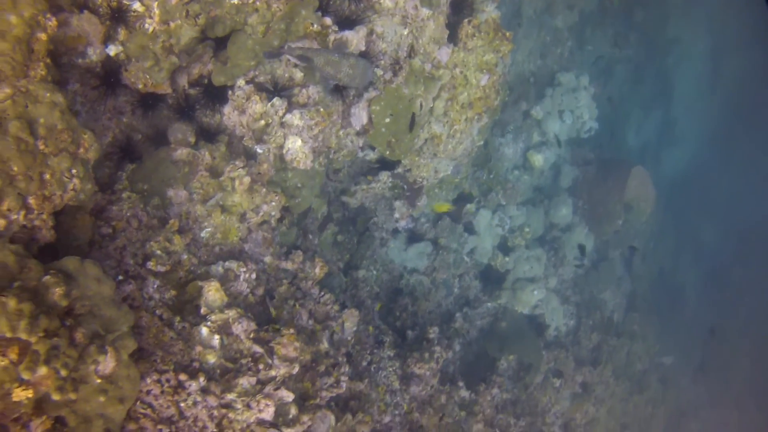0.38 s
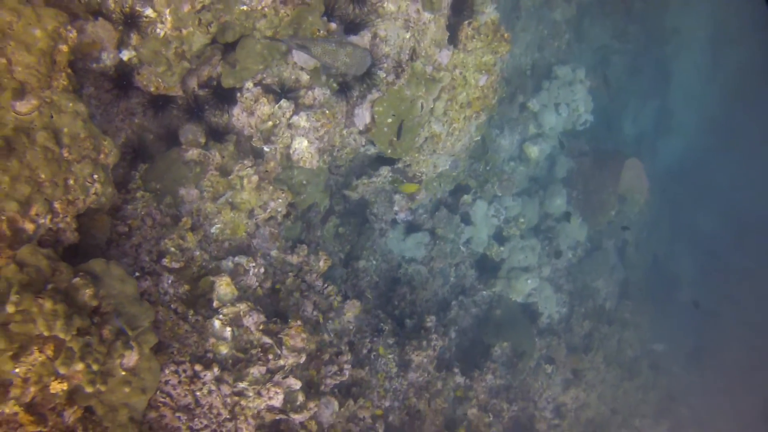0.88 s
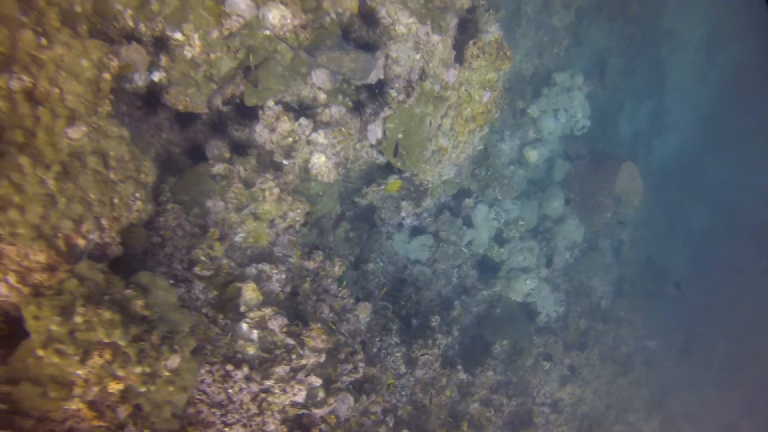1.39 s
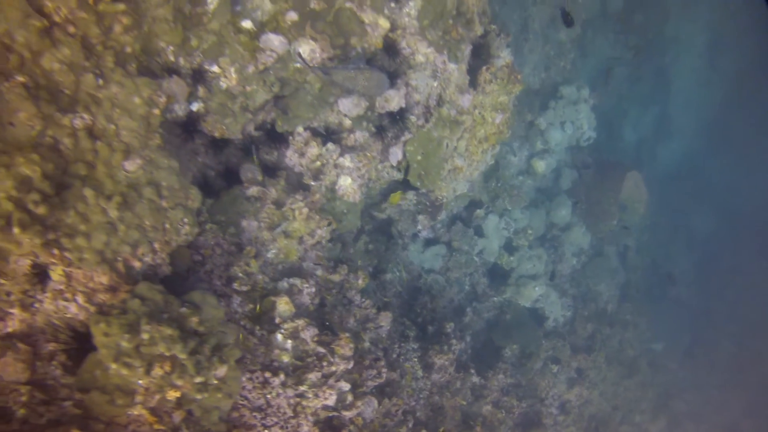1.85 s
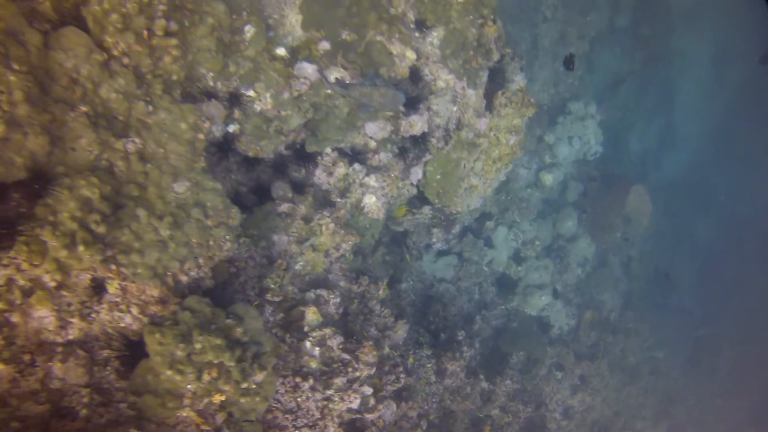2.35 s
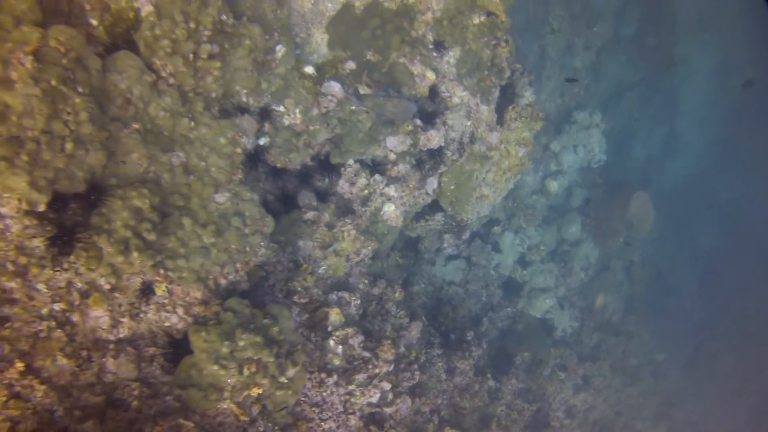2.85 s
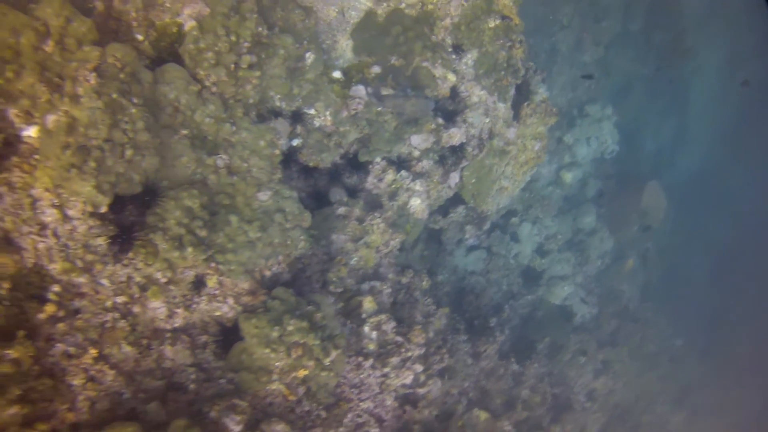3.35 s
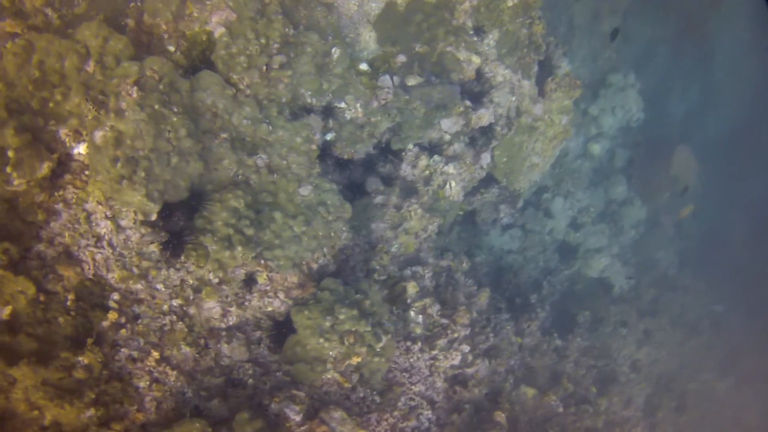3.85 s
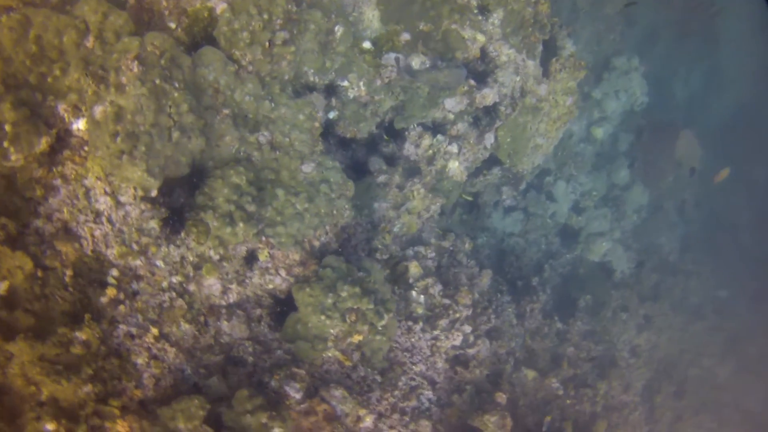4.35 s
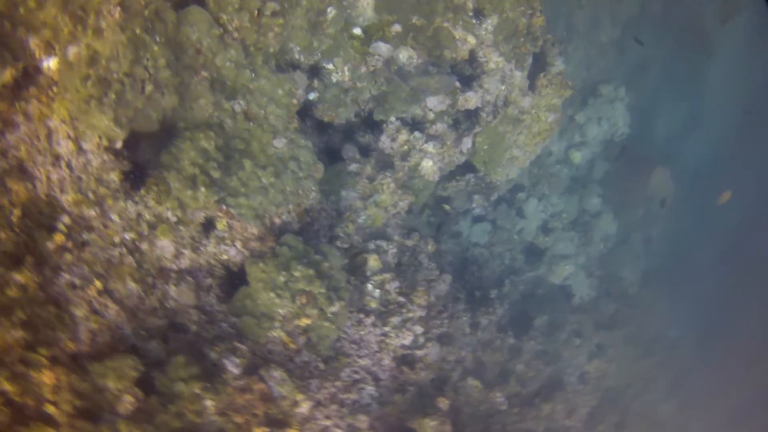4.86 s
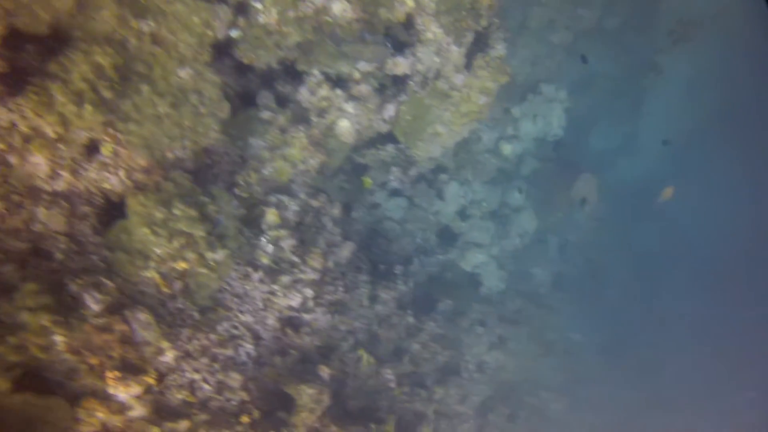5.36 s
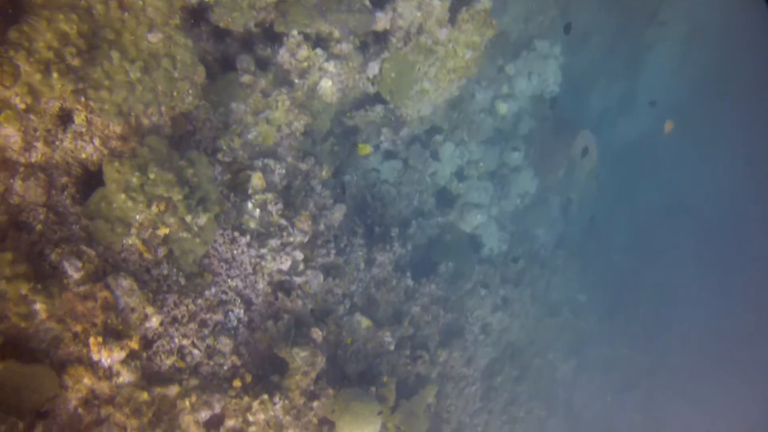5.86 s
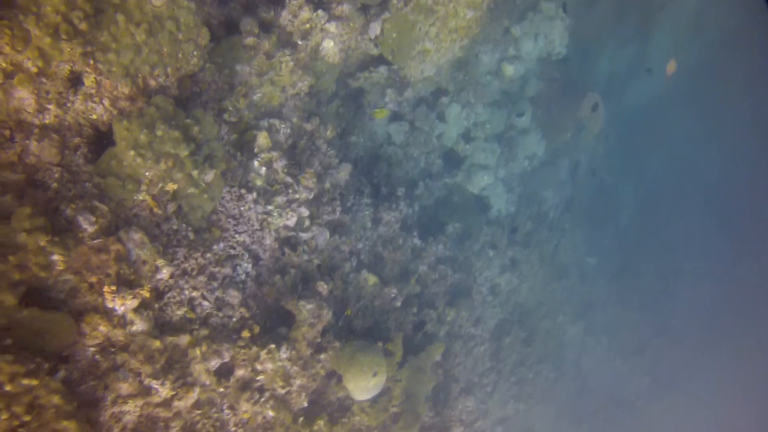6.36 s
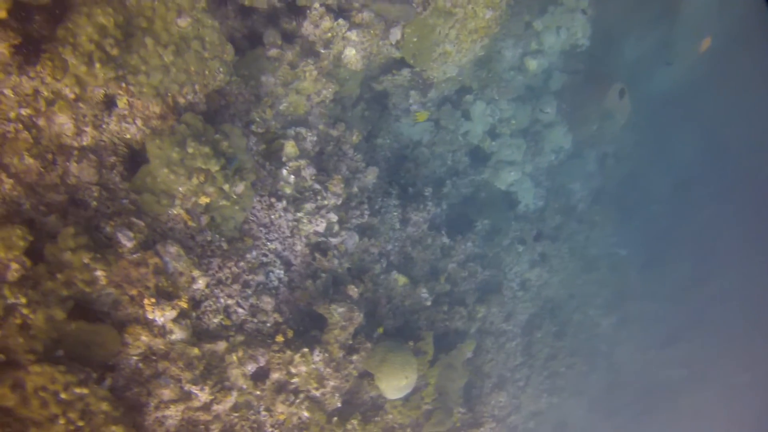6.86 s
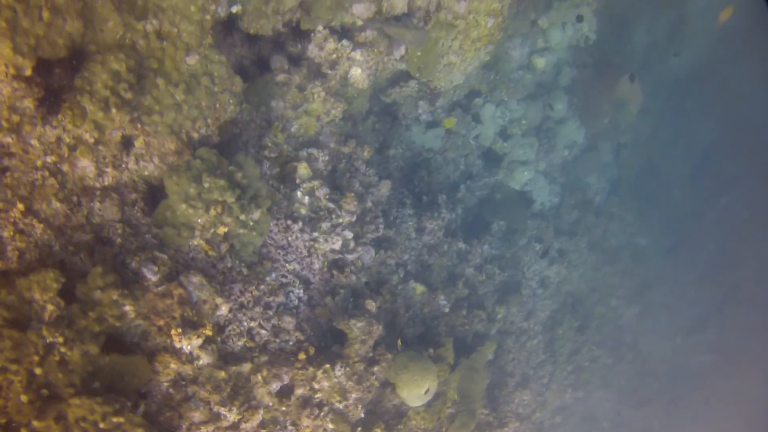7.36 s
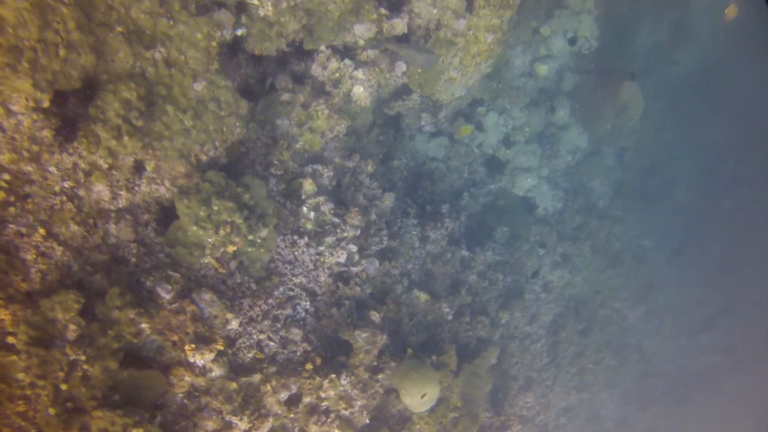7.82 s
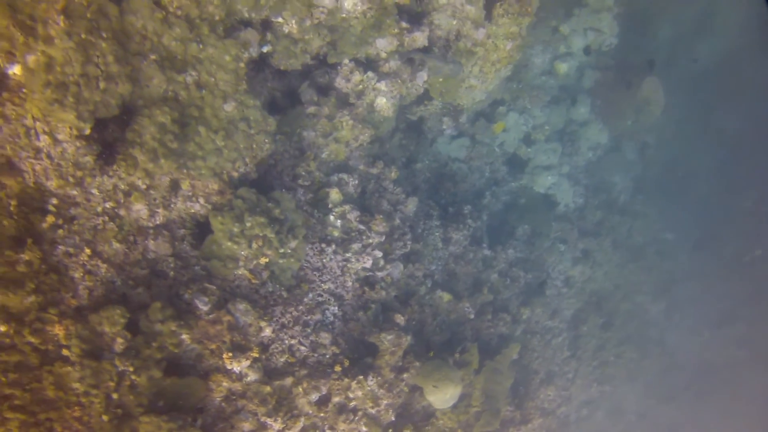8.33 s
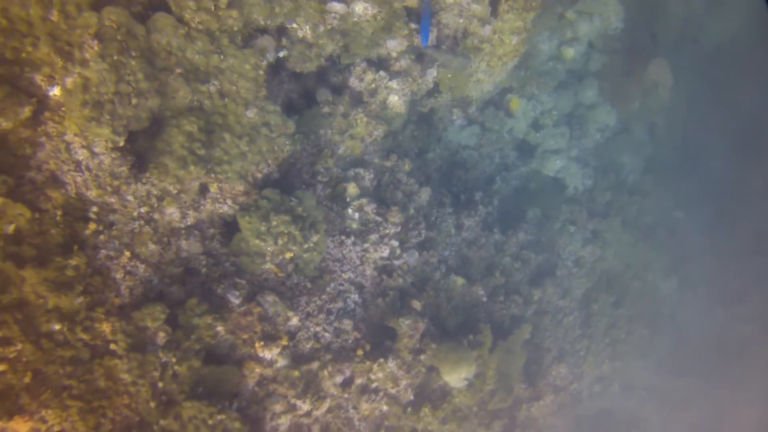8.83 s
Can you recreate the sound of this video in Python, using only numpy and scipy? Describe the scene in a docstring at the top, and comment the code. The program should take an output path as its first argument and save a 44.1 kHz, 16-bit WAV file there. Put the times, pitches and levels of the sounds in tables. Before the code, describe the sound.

A small enclosed camera under water picks up shrimp crackling all over a reef, like frying, with hard dry snaps near and far, each faintly echoed from the surface. Muffled rumble and distant bubbling lie beneath. Low thumping bubbles crowd the opening beside a faint brief whistle; pitched plops follow around the middle, then mostly clicks, and a violent crack just before the end. Mono, boxy, with harsh mirrored treble.

```python
"""Coral reef under water

Snapping shrimp crackle near and far: sharp noise bursts that ring a small camera's housing and echo off the surface.
Air bubbles thump and gurgle as ringing tones that climb in pitch. Shaped low noise makes the water rumble, and
noise through narrow resonances makes a thin whistle that swells and fades near the start.
The camera samples coarsely, in mono, which mirrors the sound into the treble."""
import sys
import numpy as np
from scipy import signal
from scipy.fft import rfft, irfft
from scipy.io import wavfile
from scipy.ndimage import uniform_filter1d

SR = 44100
rng = np.random.default_rng(int(sys.argv[2]) if len(sys.argv) > 2 else 0)


def int16_out(signal):
    """Quantize to a 16-bit WAV file."""
    q = np.round(np.clip(np.atleast_2d(signal).T, -1, 1) * 32767)
    wavfile.write(sys.argv[1], SR, q.astype(np.int16))


def gain_from_db(level_db):
    """Convert decibel levels to linear amplitude factors (20 dB per decade)."""
    decades = np.asarray(level_db, float) / 20
    return 10 ** decades


N = 406161  # length in samples


def unit(x):
    """Scale to rms 1."""
    return x / np.sqrt(np.mean(x ** 2))


def walk(rate):
    """Random levels held for 1 / rate seconds and smoothed twice; spread near 1."""
    hold = int(SR / rate)
    steps = np.repeat(rng.standard_normal(N // hold + 1), hold)
    smooth = uniform_filter1d(uniform_filter1d(steps, hold), hold)
    return unit(smooth[:N])


def add(out, s, sounds):
    """Lay each row of sounds into out at its time in seconds."""
    starts = (np.asarray(s) * SR).astype(int)
    for start, sound in zip(starts, sounds):
        out[start:start + len(sound)] += sound[:N - start]
    return out


# How stirred the water is. Each row: time in seconds, stir in dB.
WATER_STIR = [(0, -17), (.33, -8.5), (2.5, 2.5), (3.5, 2), (4.0, 10), (5.05, 6), (5.95, 5), (8.6, -1),
              (9.21, 11)]


def stir():
    """The stirring of the water in dB, joined by straight lines; it drives swell, roar and gurgle."""
    s, db = np.transpose(WATER_STIR)
    return np.interp(np.arange(N) / SR, s, db)


# Colour of the moving water. Each row: frequency in Hz, relative density in dB per Hz.
RUMBLE_COLOUR = [(15, -29), (25, -11.5), (98, 0), (162, -2), (209, -4.5), (265, -6), (320, -7), (419, -3),
                 (475, 2), (632, -11.5), (789, -28), (827, -41), (969, -13), (1100, -30.5), (1430, -71),
                 (2420, -120)]


def rumble(bubbling_db, stir_db, deep_hz=50.4, split_hz=243.0, flicker_db=1.0, lump_db=2.5, roar_db=-2.0):
    """Low noise: a deep swell follows the stir; surge and muffled roar heave together, each with its own flicker."""
    hz, db = np.transpose(RUMBLE_COLOUR)
    f = np.maximum(np.fft.rfftfreq(N, 1 / SR), 1)
    colour = rfft(rng.standard_normal(N)) * gain_from_db(np.interp(np.log(f), np.log(hz), db))
    deep, low = (1 / (1 + (f / edge) ** 4) for edge in (deep_hz, split_hz))
    swell, surge, roar = (unit(irfft(colour * share, N)) for share in (deep, low - deep, 1 - low))
    swell_db = -62.5 + stir_db
    surge_db = -49 + 7.5 * np.exp(-np.arange(N) / SR / 1.32)  # strong at first, settling over 1.32 s
    lumps = lump_db * walk(6)  # the same push of water moves surge and, half as much in dB, roar
    surge_gain = gain_from_db(surge_db + lumps + flicker_db * walk(17))
    roar_gain = gain_from_db(bubbling_db + roar_db + lumps / 2 + flicker_db * walk(12))
    return gain_from_db(swell_db) * swell + surge_gain * surge + roar_gain * roar


# The whistle's two voices. Each row: pitch in Hz, width in Hz, relative level in dB.
WHISTLE_VOICES = [(1847, 41, -2), (540, 48, -1.5)]


def whistle(peak_s=0.41, peak_db=-41, rise_db_per_s=40, fall_db_per_s=66, flicker_db=2.5):
    """Thin breathy tones: noise squeezed through narrow resonances, so they waver and break up."""
    tones = 0
    for hz, width, db in WHISTLE_VOICES:
        narrow = signal.butter(2, [hz - width / 2, hz + width / 2], "band", fs=SR, output="sos")
        flicker = gain_from_db(db + flicker_db * walk(22.5))
        tones = tones + flicker * unit(signal.sosfilt(narrow, rng.standard_normal(N)))
    after_s = np.arange(N) / SR - peak_s
    fade_db = np.minimum(rise_db_per_s * after_s, -fall_db_per_s * after_s)
    return gain_from_db(peak_db + fade_db) * tones


# What the housing rings with. Each row: mode in Hz, relative level in dB, time to fall 60 dB in seconds.
HOUSING_MODES = [(470, -10.5, 0.011), (1250, -3.5, 0.0049), (1534, -5, 0.013), (1787, 1, 0.0089),
                 (2088, 3.5, 0.0089), (2364, 5, 0.0058), (2674, 3, 0.0049), (3378, -3, 0.01),
                 (3720, -2, 0.0095), (4050, 2.5, 0.0038), (5060, 5, 0.002), (6100, -41, 0.002)]


def housing(lo_hz=0, hi_hz=6000):
    """The ring of the modes from lo_hz to below hi_hz; neighbours swing in opposite sense."""
    t = np.arange(2048) / SR
    ring = np.zeros(len(t))
    for k, (hz, db, t60) in enumerate(HOUSING_MODES):
        if lo_hz <= hz < hi_hz:
            ring += (-1) ** k * gain_from_db(db - 60 * t / t60) * np.sin(2 * np.pi * hz * t)
    return ring


def crackle(db=-50.5, per_s=300., spread_db=3.5, smear_ms=0.64, low_hz=1410.0, hiss_db=-2.0, hiss_hz=1920.0,
            clump_db=2.5):
    """Many far snaps, few loud and many soft, over the duller hiss of those too far to tell apart."""
    chance = rng.random((N, 2))
    size = gain_from_db(np.minimum(-spread_db * np.log(1 - chance[:, 1]), 20.0))
    happens = chance[:, 0] < per_s / SR * gain_from_db(clump_db * walk(14))  # they come in clumps
    decay = np.exp(-1000 / (smear_ms * SR))
    smeared = signal.lfilter([1], [1, -decay], happens * size) * rng.standard_normal(N)
    thin = signal.sosfilt(signal.butter(2, low_hz, "high", fs=SR, output="sos"), smeared)
    hiss = signal.sosfilt(signal.butter(2, hiss_hz, fs=SR, output="sos"), rng.standard_normal(N))
    far_snaps, far_hiss = (unit(signal.fftconvolve(push, housing(1000))[:N]) for push in (thin, hiss))
    return gain_from_db(db) * unit(far_snaps + gain_from_db(hiss_db) * far_hiss)


def ring_bubbles(rows, rise_cycles, glide, db_per_hz=-0.08, third_db=-4):
    """A bubble swells in over a few cycles or less, rings down and climbs in pitch; big ones swing lopsided."""
    s, db, hz, t60 = np.transpose(rows)[:, :, None]
    t = np.arange(8192) / SR
    swell = (1 - np.exp(-t * hz / rise_cycles)) * gain_from_db(-60 * t / t60)
    phase = 2 * np.pi * hz * t * (1 + glide * t / t60)
    # the overtones die first, and are weaker in small bubbles
    overtones = swell * np.sin(2 * phase) + gain_from_db(third_db) * swell ** 2 * np.sin(3 * phase)
    ring = swell * (np.sin(phase) + gain_from_db(db_per_hz * hz) * overtones)
    ring = ring / np.abs(ring).max(axis=1, keepdims=True)
    return add(np.zeros(N), s[:, 0], gain_from_db(db) * ring)


def swarm(db, count=900, hz=436.0, spread=0.285, cycles=40.0, spread_db=2.5):
    """A distant cloud of small bubbles of many sizes."""
    when, size = rng.random((count, 2)).T
    pitch = np.minimum(hz * np.exp(spread * rng.standard_normal(count)), 620.)
    relative_db = -spread_db * np.log(1 - size)
    rows = np.c_[when * (N - 1) / SR, relative_db, pitch, cycles / pitch]
    return gain_from_db(db) * unit(ring_bubbles(rows, rise_cycles=4.5, glide=0.096))


# Single bubbles, the big ones low. Each row: start in seconds, peak level in dB, pitch in Hz.
SINGLE_BUBBLES = [(0.024, -22.5, 112.4), (.242, -34, 88.6), (.42, -30.5, 113), (.609, -40, 356),
                  (0.612, -30, 85.3), (.93, -34.5, 356), (.938, -26.5, 82.7), (1.244, -33.5, 88.5),
                  (1.454, -36.5, 229), (1.734, -30.5, 97.4), (1.735, -33.5, 476), (2.09, -35, 104),
                  (2.204, -39, 115), (2.383, -36.5, 121), (2.709, -31.5, 166), (2.765, -29.5, 139),
                  (2.857, -38, 540), (2.893, -33, 102.4), (3.864, -36, 120.5), (3.948, -35, 364),
                  (3.962, -33, 100), (4.098, -34.5, 89.5), (4.33, -35, 424), (4.425, -35, 363),
                  (4.455, -35.5, 102.5), (4.65, -31.5, 409), (4.714, -34, 392), (5.068, -40, 470),
                  (5.556, -40, 99.4), (5.699, -24.5, 499), (5.825, -32.5, 486), (6.033, -38, 527),
                  (6.065, -40, 104), (6.215, -37, 118.5), (6.995, -36, 120.4), (7.394, -37, 236.5),
                  (7.805, -37, 227), (8.125, -39, 372), (8.176, -35.5, 233), (8.424, -30.5, 486),
                  (8.618, -40.5, 398)]


def single_bubbles():
    """Near bubbles, one by one; the higher the pitch, the shorter the ring."""
    t60 = 0.3 * (np.array(SINGLE_BUBBLES)[:, 2] / 100) ** -0.31  # 0.3 s at 100 Hz
    return ring_bubbles(np.c_[SINGLE_BUBBLES, t60], rise_cycles=0.71, glide=0.08)


# Near shrimp snaps; some rows, coming 7 to 10 ms after another snap, are that snap's echo off the surface. Each
# row: start in seconds, peak level in dB, then the dull part and the bright part # in dB against the body of
# the snap.
NEAR_SNAPS = [(0.1262, -28, -3, -9), (0.2694, -31, 8.5, 0), (0.4221, -25, 1.5, 0), (0.458, -20, -13, -4),
              (0.7831, -28.5, 0.5, -4), (0.9266, -30, -11, -4), (0.9335, -26, 10.5, 11),
              (0.9878, -28, 5, 5), (1.1358, -24.5, 2.5, -2.5), (1.2255, -25, -1.5, -6),
              (1.3295, -18.5, -2, -5), (1.3384, -25, -17, -7), (1.7496, -33, 7, 7), (1.7727, -26, -2, -10),
              (1.959, -32, 2, -2), (2.0283, -31, -6, 8), (2.1393, -30.5, -2, -3), (2.2083, -27, 5, 3.5),
              (2.3426, -31, -1, -6), (2.4149, -29, 1.5, -2.5), (2.4825, -32.5, -3, -3),
              (2.6326, -30.5, -1, 0), (2.6727, -31, -4, 3), (2.7082, -29.5, 2, 3), (2.8293, -30.5, -7, 4),
              (2.8645, -21.5, -1, -6), (2.9933, -33, 3, 18), (3.2774, -30.5, 2, 7),
              (3.4338, -27.5, 12, 11.5), (3.795, -29.5, 3, -12), (4.338, -28.5, -8, -12),
              (4.6538, -33, 2, -8), (4.7304, -28, -2.5, -5), (4.801, -25, -3, -7), (4.8408, -22, 1, -3),
              (4.8643, -29, 2, 2), (4.944, -31, 1, -3), (5.0096, -33, 2, -3), (5.1011, -28.5, -1, -4),
              (5.2219, -29.5, -2, -4), (5.2437, -29.5, 8, 2), (5.3009, -17, 3.5, -3.5),
              (5.3626, -31, -7, 4), (5.4503, -29, 1, -5), (5.5043, -17, -0.5, -7), (5.7025, -31, -7, 3),
              (5.7133, -30, -1, -1), (5.7198, -29.5, -1, 1), (5.7321, -28, 14, 3), (5.7847, -31, -2, 2),
              (5.805, -26.5, -20, 2), (5.8427, -14, -7, -8), (5.9535, -27.5, -3.5, 1), (6.1486, -33, 2, 6),
              (6.2294, -31, -1, 3), (6.3352, -28.5, 2, 1), (6.4129, -26, 1, 3), (6.4824, -26, 0, 6),
              (6.5043, -32.5, 4, 1), (6.792, -35, 2, 13), (6.8363, -29, 5, -2), (6.9907, -27.5, -1, -3),
              (7.054, -30, -4, -6), (7.1054, -18, -1.5, -3), (7.3026, -32, -6, 9), (7.317, -30, -2, -1),
              (7.3334, -26, 2, 0), (7.3704, -30.5, 4, -4), (7.3777, -26.5, -3, 13), (7.6, -29, 3.5, -5),
              (7.6092, -26.5, 13, 6), (7.7044, -32.5, 2, 6), (7.7267, -32, 2, 11), (7.9588, -17.5, 4, -2),
              (8.0043, -20, -8.5, -7), (8.0357, -33.5, 1, -3), (8.2406, -23.5, 12, 9),
              (8.4515, -29.5, 0, 0), (8.475, -34, 1, 0), (8.5125, -29, 0, 3), (8.5503, -22, -14, -1),
              (8.5832, -32, 1, 7), (8.7215, -17.5, 4, -2), (8.7747, -34, 3, 8), (8.7856, 1, -6, -8.5),
              (8.8138, -32, 10, 2), (9.005, -32, -6, -2), (9.0333, -30, 1, -2), (9.1114, -27.5, 3, -3),
              (9.1587, -32, -4, 14)]


def snap_rows(middle_count=40, middle_db=-30.5, middle_spread_db=4.5, colour_db=5, echo_ms=8.6, echo_spread_ms=0.5):
    """Near snaps, random ones at middle distance, and the later, weaker, duller surface echo of each."""
    when, size, dull, bright = rng.random((middle_count, 4)).T
    middle = np.c_[when * (N - 1) / SR, middle_db + middle_spread_db * (2 * size - 1),
                   colour_db * (2 * dull - 1), colour_db * (2 * bright - 1)]
    direct = np.r_[NEAR_SNAPS, middle]
    echo = direct + [0, -17.5, 12.5, -3]  # level, dull part and bright part shift in dB
    lag_ms = echo_ms + echo_spread_ms * rng.standard_normal(len(direct))
    echo[:, 0] = np.minimum(direct[:, 0] + lag_ms / 1000, (N - 1) / SR)
    return np.r_[direct, echo]


def snaps(crack=6.9, near_ms=0.59, ms_per_db=0.1, wash_db=-31, boom_db=-8.5, boom_per_db=1.3):
    """Each snap is a sharp crack, a short ragged burst behind it and a weak wash off the coral."""
    s, db, dull_db, bright_db = np.transpose(snap_rows())[:, :, None]
    ms = 1000 * np.arange(1024) / SR
    smear_ms = near_ms - ms_per_db * db  # weaker snaps come from further off, by more paths
    wash = gain_from_db(wash_db) * np.exp(-ms / 7)
    burst = rng.standard_normal((len(s), 1024)) * (np.exp(-ms / smear_ms) + wash)
    burst[:, 0] = -crack
    bands_hz = ((0, 1300), (1300, 2300), (2300, 3000), (3000, 6000))
    parts = [signal.fftconvolve(burst, housing(*band)[None], axes=1) for band in bands_hz]
    boom, dull, body, bright = (p / np.abs(p).max(axis=1, keepdims=True) for p in parts)
    # only close, strong snaps shake the lowest modes
    sound = gain_from_db(boom_db + boom_per_db * db) * boom + gain_from_db(dull_db) * dull + body + gain_from_db(bright_db) * bright
    sound = sound / np.abs(sound).max(axis=1, keepdims=True)
    return add(np.zeros(N), s[:, 0], gain_from_db(db) * sound)


def scene():
    """All sources reach one microphone."""
    stir_db = stir()
    bubbling_db = -46 + 0.26 * stir_db
    water = rumble(bubbling_db, stir_db)
    air = swarm(bubbling_db - 5.0) + single_bubbles()
    mono = water + whistle() + crackle() + air + snaps()
    return np.array([mono, mono])


def roll_off(x):
    """The treble ends steeply here."""
    return signal.sosfilt(signal.butter(12, 16500, fs=SR, output="sos"), x)


def record(dry, self_noise_db=-66):
    """The camera samples at 12 kHz and holds each value four times, which mirrors the sound into the treble."""
    rounded = 0.8 * np.tanh(dry / 0.82)  # loud peaks are softly flattened
    noisy = rounded + gain_from_db(self_noise_db) * rng.standard_normal(N)
    coarse = signal.resample_poly(noisy, 40, 147, axis=1)  # to 12 kHz
    held = np.repeat(coarse, 4, axis=1)  # 48 kHz
    stepped = signal.resample_poly(held, 147, 160, axis=1)[:, :N]  # back to SR
    top = signal.ellip(5, .3, 19, 15200, fs=SR, output="sos")
    return roll_off(signal.sosfilt(top, stepped))


dry = scene()
out = record(dry)
int16_out(out)
```